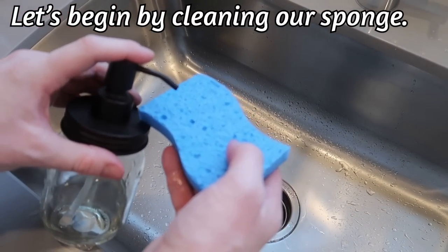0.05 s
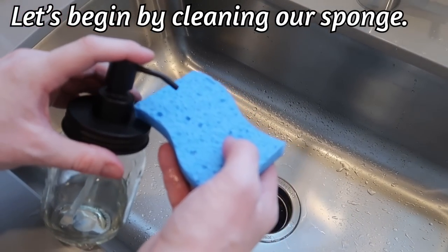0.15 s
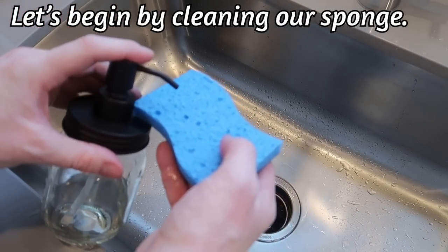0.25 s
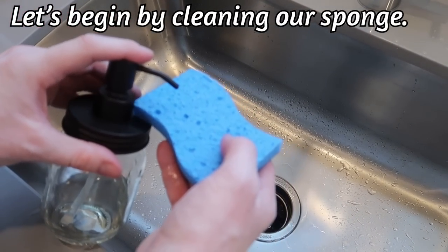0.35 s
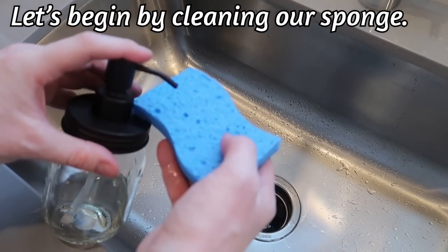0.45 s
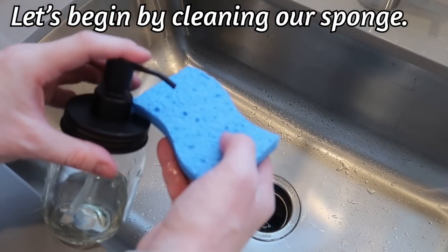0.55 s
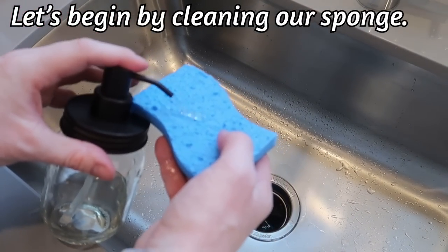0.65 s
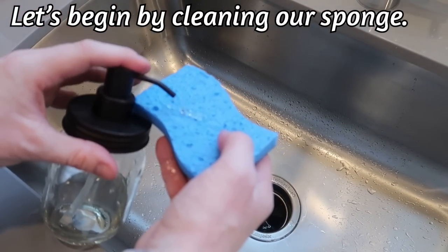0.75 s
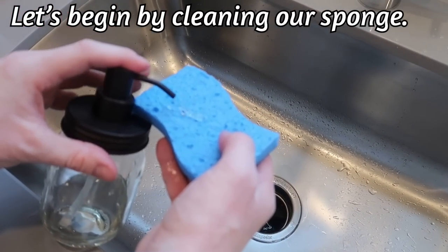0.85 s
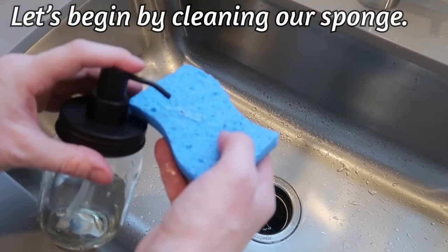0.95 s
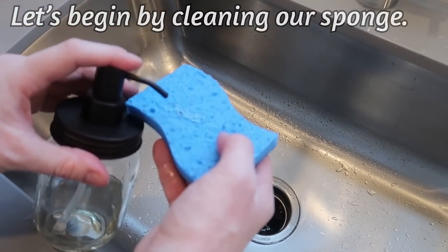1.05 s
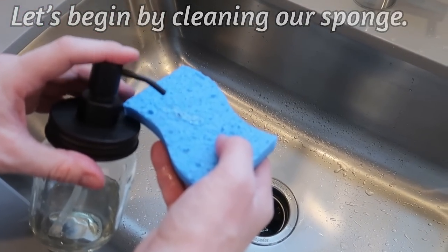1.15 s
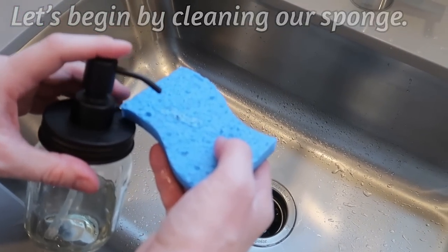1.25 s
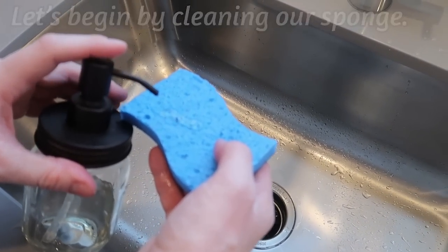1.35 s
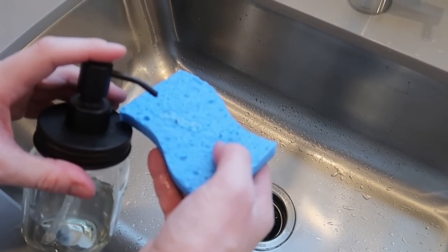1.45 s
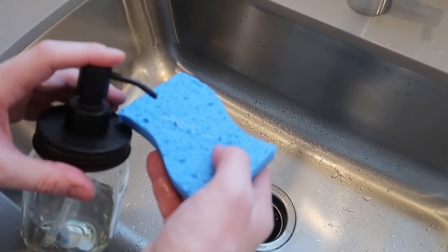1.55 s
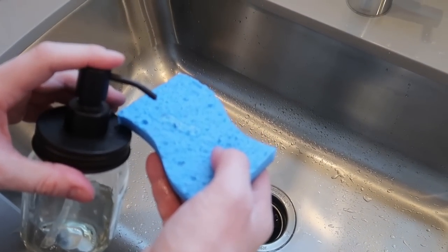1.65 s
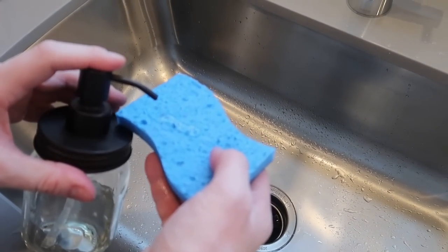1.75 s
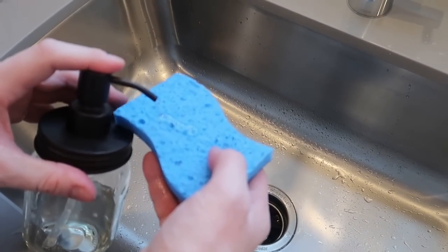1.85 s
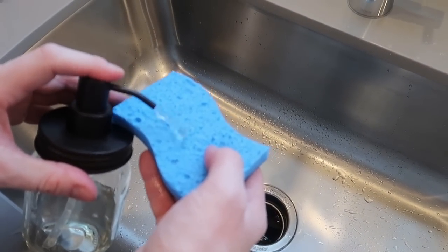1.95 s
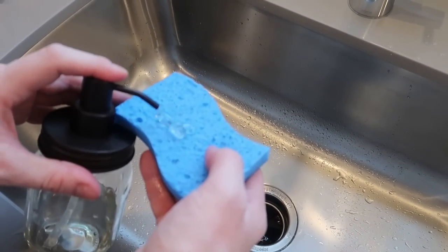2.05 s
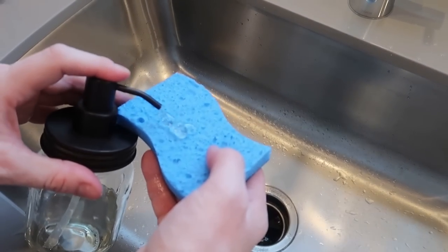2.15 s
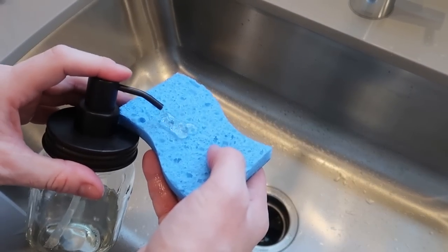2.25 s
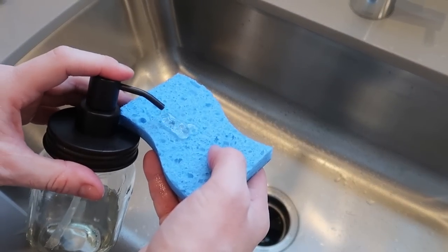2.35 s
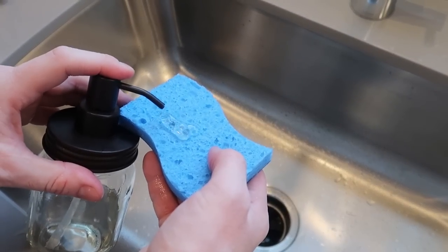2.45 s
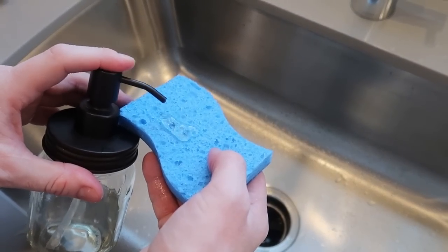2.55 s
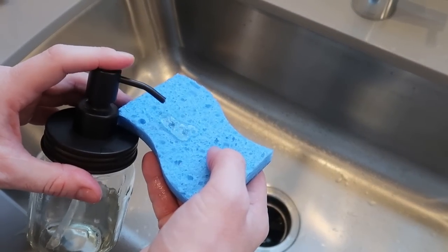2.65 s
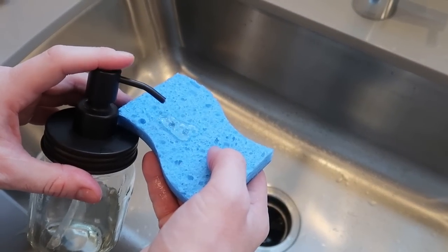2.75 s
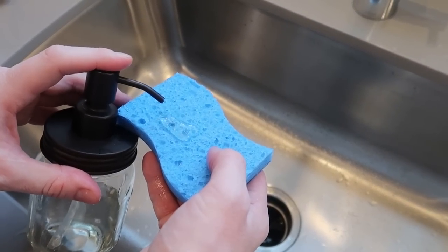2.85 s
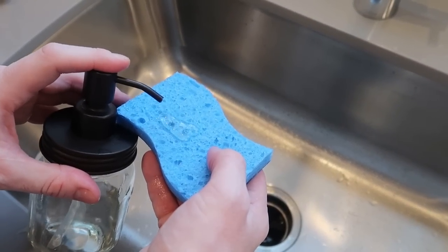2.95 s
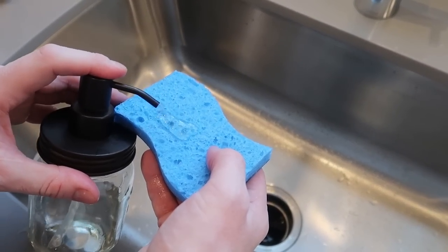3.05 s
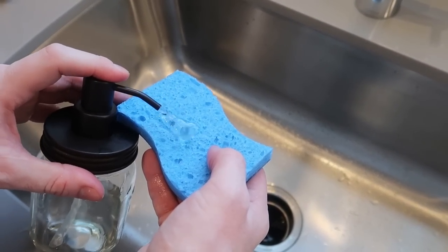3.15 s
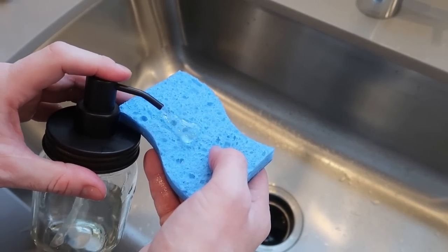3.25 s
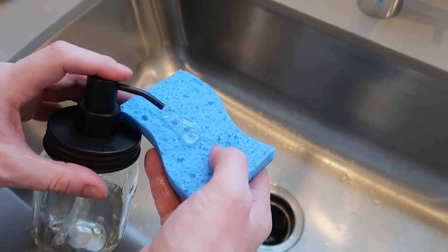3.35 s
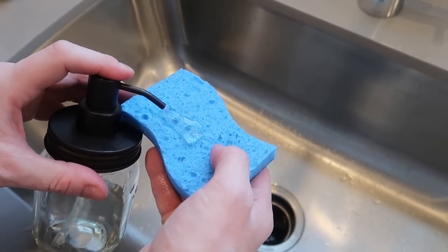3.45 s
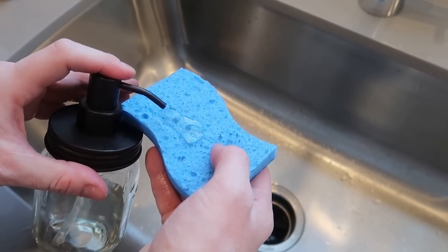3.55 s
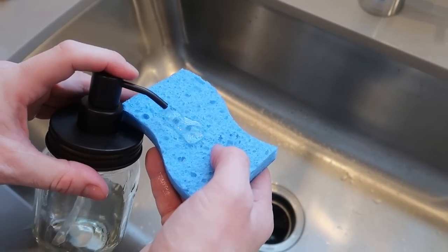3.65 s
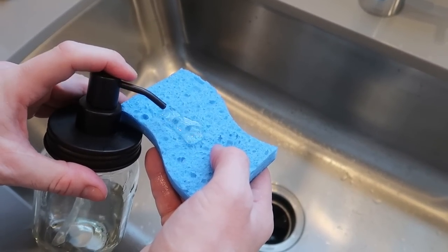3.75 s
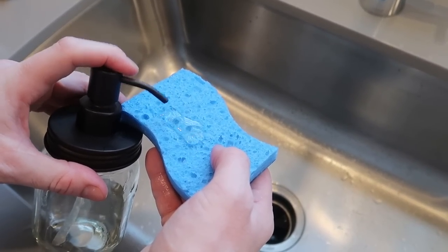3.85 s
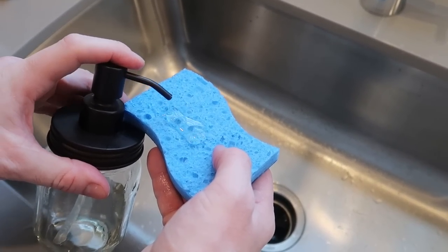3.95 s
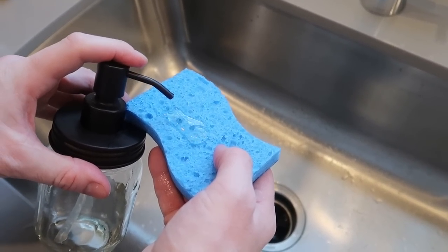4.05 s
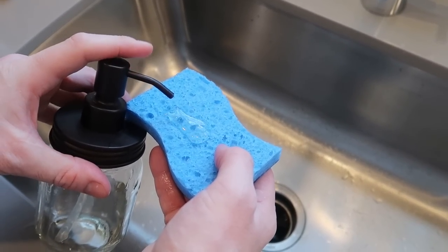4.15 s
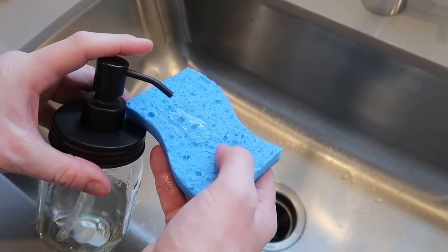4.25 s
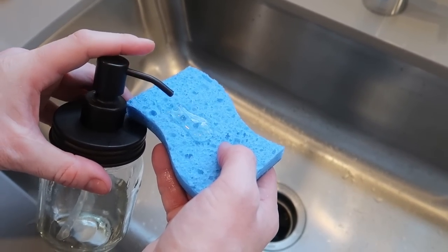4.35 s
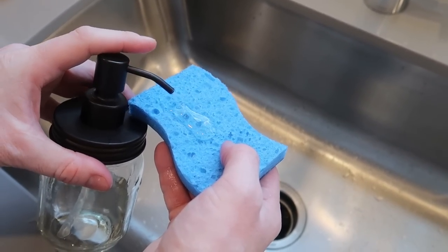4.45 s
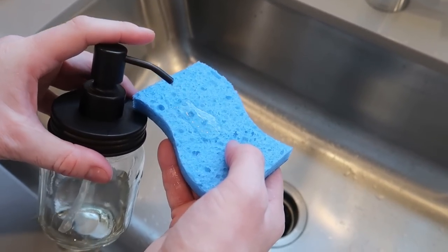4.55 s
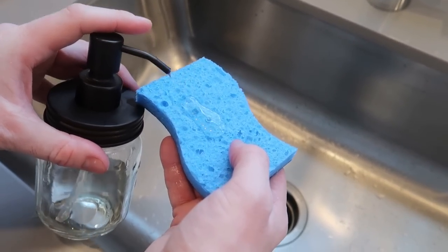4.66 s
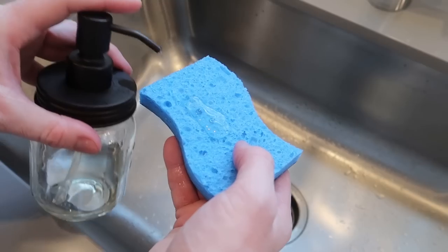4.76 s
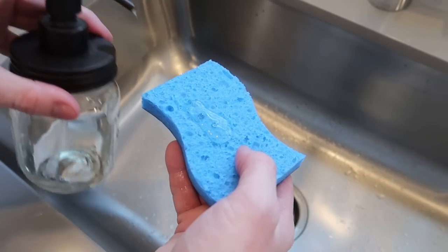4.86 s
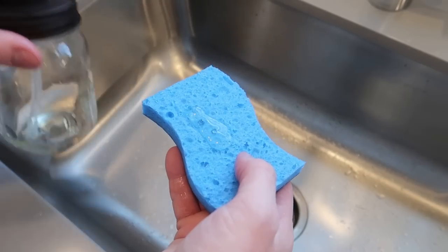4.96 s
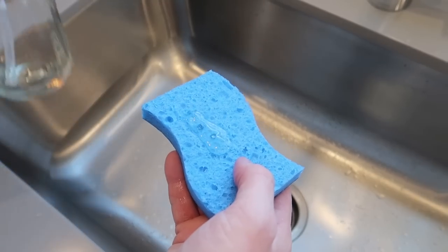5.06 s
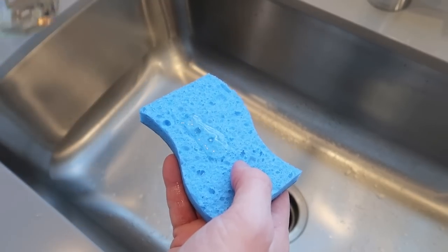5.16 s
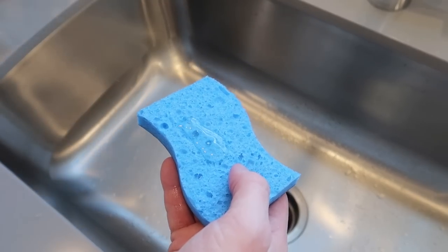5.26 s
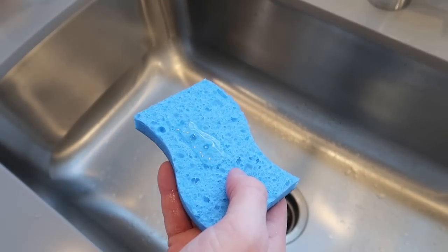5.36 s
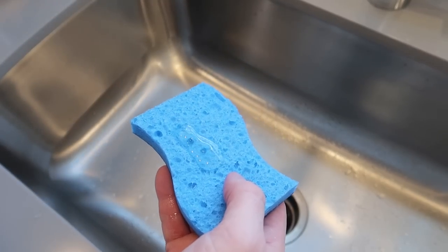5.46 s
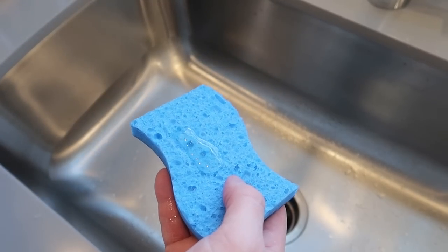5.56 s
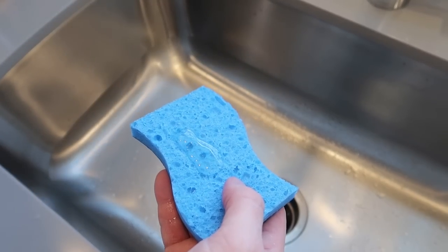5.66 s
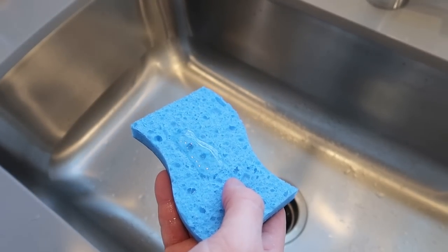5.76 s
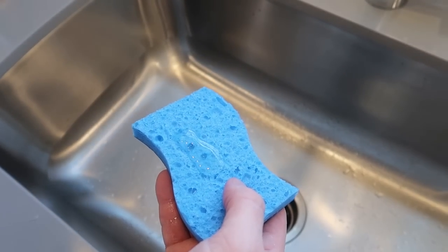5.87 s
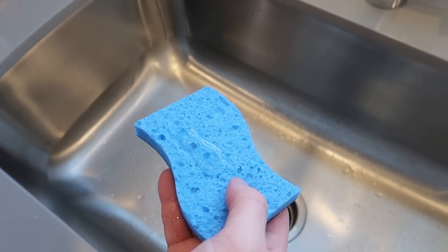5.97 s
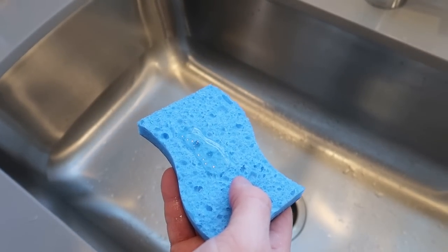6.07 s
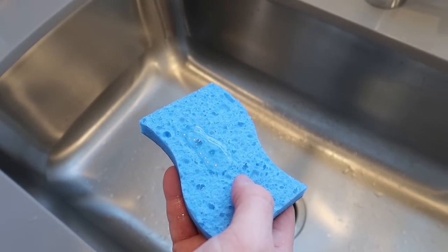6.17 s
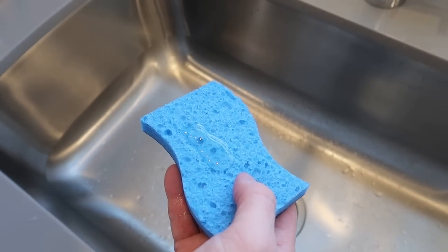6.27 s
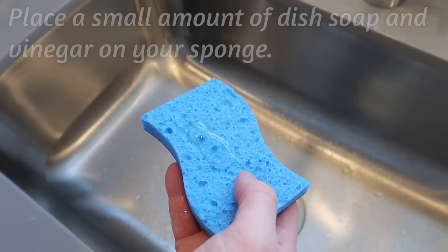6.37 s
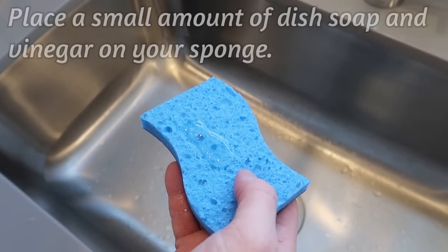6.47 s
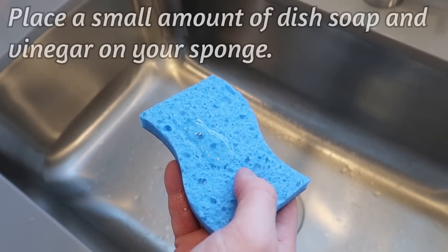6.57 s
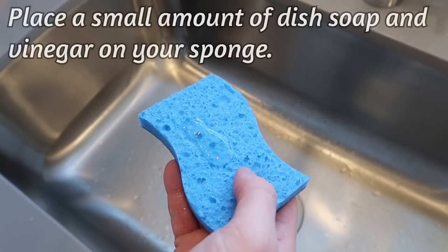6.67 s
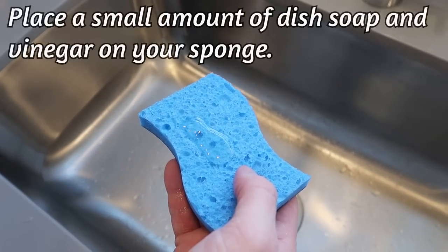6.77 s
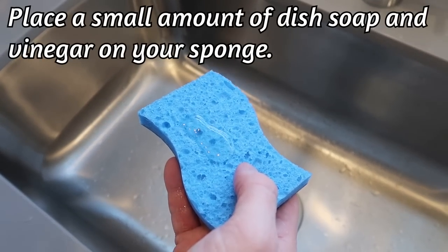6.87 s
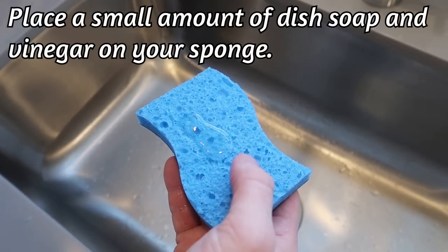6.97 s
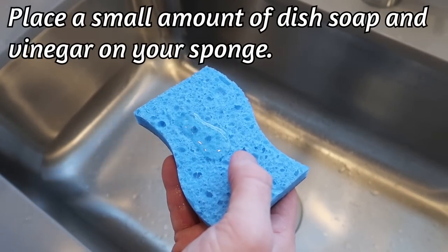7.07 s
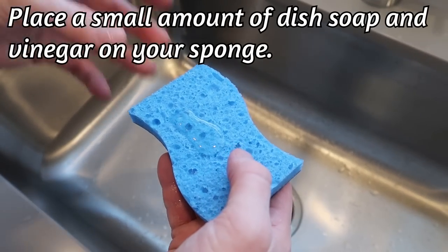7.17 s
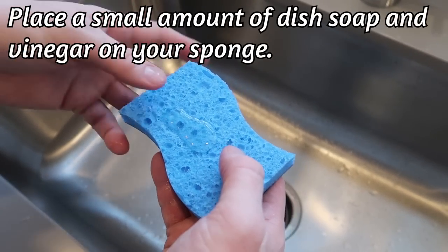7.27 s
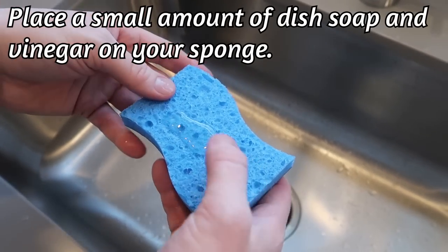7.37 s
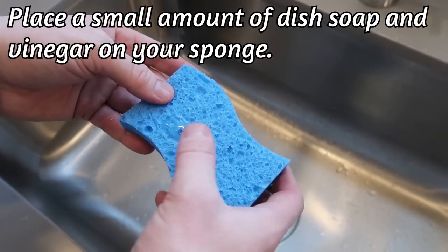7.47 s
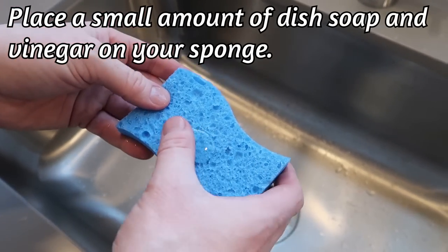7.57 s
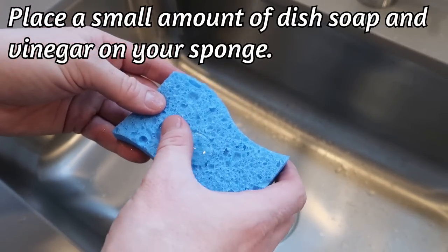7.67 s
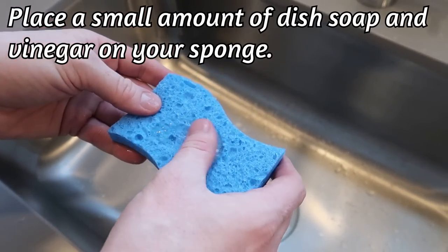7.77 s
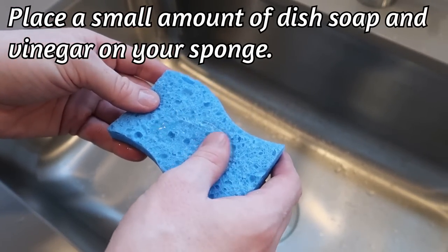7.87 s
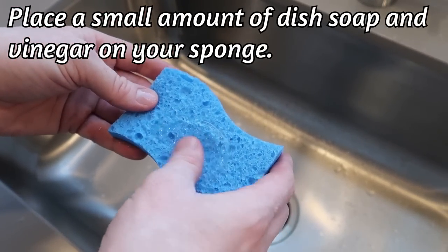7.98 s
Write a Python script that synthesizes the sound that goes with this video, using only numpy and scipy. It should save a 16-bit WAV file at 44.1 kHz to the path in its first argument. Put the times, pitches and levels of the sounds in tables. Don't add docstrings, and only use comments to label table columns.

```python
import sys
import numpy as np
from scipy import signal
from scipy.fft import rfft, irfft
from scipy.io import wavfile
from scipy.ndimage import uniform_filter1d

SR = 44100
rng = np.random.default_rng(int(sys.argv[2]) if len(sys.argv) > 2 else 0)


def materialize(psi):
    bounded = np.clip(np.atleast_2d(psi).T, -1, 1)
    quanta = np.round(bounded * 32767).astype(np.int16)
    wavfile.write(sys.argv[1], SR, quanta)


def voltage_ratio(decibels):
    exponent = np.asarray(decibels, float) / 20
    return 10 ** exponent


N = 353682
T = np.arange(N) / SR
BASIN_BOOM_HZ = 116.2
EFFORT_RISE_DB_S = 1500


def on_log(hz, table):
    at, value = np.transpose(table)
    return np.interp(np.log(np.maximum(hz, 1)), np.log(at), value)


def coloured(size, table):
    hz = np.fft.rfftfreq(size, 1 / SR)
    return irfft(rfft(rng.standard_normal(size)) * voltage_ratio(on_log(hz, table)), size)


def unit(x):
    return x / np.sqrt(np.mean(x ** 2))


def wander(smooth):
    return unit(uniform_filter1d(uniform_filter1d(rng.standard_normal(N), smooth), smooth))


def grains(depth_db, smooth):
    noise = rng.standard_normal(N)
    return noise * voltage_ratio(depth_db * unit(uniform_filter1d(rng.standard_normal(N), smooth)))


def onset(t, rise_s):
    return 1 - np.exp(-t / rise_s)


def ring(modes, slow, scatter_db, rise_s, detune=0.014):
    hz, db, t60 = np.transpose(modes)[:, :, None]
    t = T[:SR // 2]
    chance = rng.standard_normal((3, len(modes), 1))
    waves = np.sign(chance[1]) * np.sin(2 * np.pi * hz * (1 + detune * chance[0]) * t)
    decay = voltage_ratio(-60 * t / np.maximum(t60 * slow, .002))
    x = np.sum(voltage_ratio(db + scatter_db * chance[2]) * waves * decay, axis=0)
    x = x * onset(t, rise_s)
    return x / np.abs(x).max()


def burst(t60, rise_s):
    t = T[:SR // 2]
    return rng.standard_normal(len(t)) * voltage_ratio(-60 * t / t60) * onset(t, rise_s)


def resonate(x, peaks):
    y = 0
    for hz, width, db in peaks:
        b, a = signal.iirpeak(hz, hz / width, fs=SR)
        y = y + voltage_ratio(db) * signal.lfilter(b, a, signal.lfilter(b, a, x))
    return y / np.abs(y).max()


def pressure(rows, rise_db_s, fall_db_s):
    gain = 0
    for s, db, held in rows:
        early = np.maximum(s - T, 0)
        late = np.maximum(T - s - held, 0)
        gain = gain + voltage_ratio(db - rise_db_s * early - fall_db_s * late)
    return gain


def add(out, s, x, pan_db):
    for side, sign in zip(out, (1, -1)):
        i = max(int(s * SR - sign * pan_db * .5), 0)
        side[i:i + len(x)] += x[:N - i] * voltage_ratio(sign * pan_db / 2)


# start_s, middle_level_db, low_rel_db, upper_rel_db,
# ring_t60_factor
BASIN_KNOCKS = [(0.002, -25.5, -9.5, -10.5, 0.36), (0.098, -26.5, -6, -11, 0.38),
                (0.367, -35.5, -0.5, 1, 0.64), (0.635, -24.5, 1, -5.5, 0.65), (0.73, -29, 8, -2, 0.31),
                (1.35, -34, 2, 0, 0.41), (1.952, -34.5, 2.5, -4.5, 0.89), (2.0468, -28, 4.5, 0, 0.29),
                (2.608, -36, -0.5, -10, 0.87), (2.724, -41, 2.5, -3, 0.42), (3.124, -34, -7.5, -3, 0.37),
                (3.131, -25.5, -4, -3.5, 0.093), (3.236, -40.5, 4, 6, 0.28), (4.16, -36, 0.5, -3.5, 0.27),
                (4.292, -49, 5, 0, 0.53)]
# start_s, middle_level_db, low_rel_db
HAND_NUDGES = [(0.129, -42, -11), (1.087, -45, 16), (1.218, -43, 10.5), (1.246, -42.5, 8),
               (1.869, -47, 14.5), (2.452, -43, 10.5), (2.555, -43.5, 6.5), (3.045, -45, 11),
               (3.075, -42.5, 6.5), (3.16, -33.5, -2), (3.187, -43, 2), (0.175, -57, -9), (0.442, -60, 5),
               (6.669, -41.5, 7)]
# start_s, middle_level_db, low_rel_db, upper_rel_db, wall_pitch_hz
WALL_KNOCKS = [
    (3.2153, -21, 6.5, 1, 910),
    (3.739, -49.5, 11.5, 11, 995),
    (3.9591, -31.5, 2, 4.5, 1039),
]
# start_s, middle_level_db, low_rel_db, upper_rel_db
BASE_ROCKS = [
    (4.507, -30.5, -0.5, -12.5),
    (4.538, -45, 6, -12),
    (6.708, -29.5, -6, -15),
    (6.716, -29, -26, -7),
    (6.744, -39, -1, -2),
    (6.92, -49, 11, 0),
    (6.96, -54, -1, -2),
    (4.198, -53, -14, -18),
]
# pitch_hz, level_db, t60_s
BASIN_LOW_MODES = [(181, 2, 0.1), (229.5, -2.5, 0.21), (260.4, 3, 0.16), (294.4, 3, 0.17),
                   (337.2, 4.5, 0.21), (400, -1, 0.12)]
BASIN_MID_MODES = [(451.5, -0.5, 0.12), (503.3, -5.5, 0.32), (556, 2, 0.14), (625, -10, 0.32),
                   (751, -1, 0.13)]
BASIN_UP_MODES = [(690, -24, 0.12), (893, -3.5, 0.2), (1005, 13.5, 0.055), (1206, -10, 0.3),
                  (1146, -39, 0.18), (1388, -21, 0.038), (1460, -34, 0.027), (1800, -61, 0.02)]


def knocks():
    out = np.zeros((2, N))
    soft_s, basin_lead_hz = .003, 562
    many = signal.butter(5, [420, 1600], "bandpass", fs=SR, output="sos")
    blows = [(*row, basin_lead_hz) for row in BASIN_KNOCKS]
    blows += [(*row, -9, 0.45, basin_lead_hz) for row in HAND_NUDGES]
    blows += [(*row, 0.4, hz) for *row, hz in WALL_KNOCKS]
    blows += [(*row, 0.37, 699) for row in BASE_ROCKS]
    for s, db, low_db, up_db, slow, hz in blows:
        low = voltage_ratio(low_db - 1.0) * ring(BASIN_LOW_MODES, 0.66, 2.5, 2 * soft_s)
        mid = 0.7 * ring(BASIN_MID_MODES, slow, 1.8, soft_s)
        rattle = signal.sosfilt(many, burst(0.28 * slow, soft_s))
        rattle = rattle / np.abs(rattle).max()
        on_jar = hz > 850
        up = ring(BASIN_UP_MODES, slow, 6.2, soft_s / 2) + 0.69 * rattle
        up = voltage_ratio(up_db - 11.0 * on_jar) * up
        lead_db = up_db - 3.5 if on_jar else -6.5 - 0.4 * up_db
        lead_rise_s = soft_s / 4 if on_jar else soft_s
        lead = voltage_ratio(lead_db) * ring([(hz, 0, .11)], slow, 0, lead_rise_s, detune=0)
        add(out, s, voltage_ratio(db) * (low + mid + up + lead), 0)
    return out


# start_s, level_db, lower_rel_db, upper_rel_db, left_minus_right_db
HEAD_SNAPS = [(0.6829, -11, -7.5, -23, 1), (0.6859, -20, -6, -23, -1.5), (1.95, -21.5, 0.5, -17, 1),
              (1.9544, -44, -10, -26, 0), (2.0478, -32, 1.5, -32, 1), (2.599, -32, -1, -25, -1),
              (2.6018, -29.5, 5, -17, 1), (3.1262, -31, -7, -3, -2.5), (3.128, -32, -21, 0, 11),
              (3.215, -28, 8.5, -12, 2), (3.967, -46, 9, -3, 0)]
# start_s, level_db, lower_rel_db
HEAD_CREAKS = [(1.086, -52, -5), (1.1522, -42.5, -4), (1.168, -59, -11), (1.2368, -46, 5),
               (1.2572, -57, 17), (2.439, -53, 5), (2.5545, -46.5, -6), (3.739, -53, -3),
               (4.3924, -51, -14), (4.4822, -53, -1), (4.616, -53, -9.5)]
# pitch_hz, width_hz, level_db
HEAD_PEAKS = [(2800, 1080, 11), (3080, 410, 11), (3160, 560, -6), (3410, 97, 11.5), (3520, 250, 8)]
COLLAR_PEAKS = [(1600, 1700, 18.5), (1470, 170, 15), (1940, 130, 21.5), (2260, 220, -9)]
HEAD_TOP_PEAKS = [(4820, 540, -19), (5320, 1300, -9), (6360, 2500, -16)]


def snaps():
    out = np.zeros((2, N))
    dull = signal.butter(5, 3950, fs=SR, output="sos")
    snap_t60_s, creak_t60_s, creak_up_db, creak_pan_db = 0.026, 0.078, -11, 1
    clicks = [(*row, snap_t60_s) for row in HEAD_SNAPS]
    clicks += [(*row, creak_up_db, creak_pan_db, creak_t60_s) for row in HEAD_CREAKS]
    for s, db, low_db, up_db, pan_db, t60 in clicks:
        hit = voltage_ratio(-18.0) * burst(t60, 0.00018)
        heavy = voltage_ratio(-11) * hit
        hit[0] = heavy[0] = 1
        body = resonate(hit, HEAD_PEAKS) + voltage_ratio(low_db) * resonate(heavy, COLLAR_PEAKS)
        body = signal.sosfilt(dull, body)
        add(out, s, voltage_ratio(db) * (body + voltage_ratio(up_db) * resonate(hit, HEAD_TOP_PEAKS)), pan_db)
    return out


# start_s, level_db, broad_rel_db, left_minus_right_db, pitch_hz
SPRING_TICKS = [(0.679, -44, -14, -1, 8800), (0.682, -29.5, -28, 0, 12500), (0.6875, -37.5, 10.5, 2, 12000),
                (0.8655, -54, -20, 4.5, 12500), (1.949, -51, 6, 8, 11800), (2.6004, -54, -12, 3, 11800),
                (2.6114, -47, -12, 2.5, 11800), (3.1247, -35, -9, 5, 12200), (3.128, -30.5, -18, 8, 12100),
                (3.1321, -34, -18, 2.5, 11200), (3.2093, -57, 5, -1, 11000), (3.2154, -53, 6, 5.5, 8850),
                (3.953, -48, -12, 1.5, 8500), (3.96, -47, -15, 0, 14500), (3.9605, -47, -14, -1, 11900),
                (3.968, -49, -6, 4.5, 11500), (4.8524, -64, 13, -0.5, 10000), (6.4, -46.5, 2, 6, 8700)]
# pitch_hz, width_hz, level_db
SPRING_SEAT = [(8440, 8400, 0)]


def ticks():
    out = np.zeros((2, N))
    for s, db, low_db, pan_db, hz in SPRING_TICKS:
        hit = burst(0.007, 0.00014)
        wire = resonate(hit, [(hz, 1600, 0)])
        add(out, s, voltage_ratio(db) * (wire + voltage_ratio(low_db) * resonate(hit, SPRING_SEAT)), pan_db)
    return out


# start_s, level_db, hollow_rel_db, long_ring_rel_db, ring_t60_factor
BALL_CHINKS = [
    (2.602, -57, -6, -4, 0.9),
    (2.6105, -48.5, 10.5, -6, 0.53),
    (3.13, -37, -28, -22, 0.9),
    (3.967, -39.5, -18, -11.5, 0.93),
    (4.3923, -59, -2, 2, 0.1),
    (6.314, -55, 1, -1, 0.08),
]
# pitch_hz, level_db, t60_s
BALL_MODES = [(4070, -6.5, 0.11), (4400, -28, 0.065), (5100, -12, 0.064), (6180, -7.5, 0.088),
              (6368, -13, 0.08), (6540, -3.5, 0.076), (7780, -12, 0.09), (8900, -24, 0.071)]
HOLLOW_MODE = [(3025, 0, 0.13)]
LONG_RING = [(5376, 0, 0.17)]


def chinks():
    out = np.zeros((2, N))
    for s, db, hollow_db, sing_db, slow in BALL_CHINKS:
        glass = 0.84 * ring(BALL_MODES, slow, 0.92, 0.00089, detune=0.0011)
        sing = voltage_ratio(sing_db) * ring(LONG_RING, slow, 0, 0.0087, detune=0)
        hollow = voltage_ratio(hollow_db) * ring(HOLLOW_MODE, slow, 0, 0.0044, detune=0)
        add(out, s, voltage_ratio(db) * (glass + sing + hollow), .3)
    return out


# start_s, level_db
LANDING = [
    (6.399, 0.5),
]
# pitch_hz, level_db per Hz
THUD_SPECTRUM = [(59, -27), (100, 10), (170, 1.5), (260, 0.5), (505, -6), (636, -3.5), (1010, 4),
                 (1980, -8), (2140, -10), (3400, -32.5), (6300, -45), (7350, -81), (10000, -63),
                 (13000, -85), (22000, -120)]
# pitch_hz, level_db, t60_s
COUNTER_MODES = [(116.5, -22, 0.94), (158, -23, 0.13), (216, -3, 0.1), (258, -1, 0.18), (334, -3.5, 0.095),
                 (491.5, 0.5, 0.22), (563, -10, 0.19), (707.4, -5, 0.27), (606, -8, 0.17), (910, -11, 0.18),
                 (970, -4, 0.15), (1085, -11, 0.17), (1232, -0.5, 0.16), (1403, -6, 0.11),
                 (1660, -22, 0.12), (1940, -9, 0.28), (2226, 6.5, 0.03), (2346, -5, 0.033)]
GLASS_MODES = [(4100, -4, 0.0245), (4480, 0, 0.058), (5140, -15, 0.026), (6190, 4.5, 0.071),
               (6280, -11, 0.22), (8700, -10, 0.024)]


def set_down():
    out = np.zeros((2, N))
    s, db = LANDING[0]
    t = T[:SR // 2]
    cupboards = voltage_ratio(-15.0 - 60 * t / 0.63)
    thud = unit(coloured(len(t), THUD_SPECTRUM)) * (voltage_ratio(-60 * t / 0.084) + cupboards) * onset(t, 0.0032)
    top = ring(COUNTER_MODES, 0.51, 0, 0.0013, detune=0)
    small = signal.butter(3, 95, "highpass", fs=SR, output="sos")
    wood = signal.sosfilt(small, voltage_ratio(db - 11.5) * thud + voltage_ratio(db - 6.0) * top)
    swell = voltage_ratio(db - 9.5 - 60 * t / 0.22) * onset(t, 0.021) ** 2
    wood = wood + swell * np.sin(2 * np.pi * BASIN_BOOM_HZ * t)
    loose = signal.butter(6, (910, 2530), "bandpass", fs=SR, output="sos")
    mid, side = (signal.sosfilt(loose, burst(0.28, 0.0017)) * voltage_ratio(db - 18.5) for _ in range(2))
    for channel, sign in zip(out, (1, -1)):
        channel[int(s * SR):][:len(t)] += mid + sign * voltage_ratio(-5) * side
    glass = voltage_ratio(db - 37.0) * ring(GLASS_MODES, 0.99, 0, 0.00037, detune=0)
    add(out, s, wood + glass, .1)
    return out


# start_s, pitch_hz, level_db, t60_s
LONE_PINGS = [(0.0005, 854, -28.5, .05), (0.012, 537, -34, .05), (0.021, 1340, -47, .06),
              (0.048, 800, -40, .05), (0.098, 566, -29, .1), (0.104, 1450, -44, .06),
              (0.109, 1850, -51, .05), (0.124, 567, -40, .08), (0.16, 567, -44, .1),
              (1.068, 2000, -58, .03), (1.068, 2950, -56, .03), (1.087, 3300, -52, .03),
              (1.152, 2010, -50, .06), (1.168, 3250, -53, .02), (1.237, 2700, -43, .03),
              (1.262, 2050, -49, .04), (1.283, 3100, -59, .03), (2.6, 1960, -34, .07),
              (2.6, 4430, -40, .02), (2.601, 5330, -41, .03), (2.612, 1850, -40, .06),
              (2.632, 1110, -45, .07), (3.1275, 3670, -37, .05), (3.128, 3070, -29, .015),
              (3.132, 243, -21, 0.079), (3.155, 3300, -49, .03), (3.168, 3980, -44, .02),
              (3.196, 3200, -50, .02), (3.211, 3660, -39, .015), (3.216, 4400, -37, .015),
              (3.217, 1490, -38.5, .06), (3.23, 1810, -43, .08), (3.959, 2000, -46, .02),
              (3.959, 1046, -30, .045), (3.972, 2000, -55, .05), (3.972, 616, -37, .1),
              (3.98, 1110, -50, .2), (0.684, 3330, -33, 0.13), (0.667, 3600, -52, .03),
              (4.394, 4100, -58, .02), (4.418, 5300, -57, .02), (4.616, 3030, -58, .02),
              (1.951, 3730, -36, .04), (3.208, 5300, -48, .015), (6.41, 2580, -39, 0.26),
              (6.42, 2050, -38, 0.29), (6.403, 4600, -46, .05), (6.4037, 502, -17.5, .05),
              (6.411, 988, -11, .05),
              (0.38, 250, -33, 0.16), (0.374, 640, -39, 0.065), (0.38, 1360, -43, .08),
                (0.436, 190, -37, .04), (0.74, 490, -33.5, 0.057), (1.952, 180, -34, 0.042),
                (2.052, 338.6, -24.5, 0.18), (2.078, 360, -31, .1), (2.066, 1100, -44, .06),
                (2.43, 550, -46, 0.11), (3.08, 553, -50, .06), (3.129, 550, -30, .04),
                (3.158, 540, -29, 0.049), (3.157, 230, -27, .06), (3.221, 338, -19.5, .12),
                (3.244, 335, -23, 0.095), (3.277, 330, -32.5, .08), (3.134, 195, -30, 0.072),
                (3.14, 450, -35, 0.11), (3.182, 200, -33, .08), (3.192, 580, -33, .05),
                (3.222, 467, -29.5, 0.074), (3.124, 1400, -33, .04), (3.086, 273, -40, .08),
                (1.5, 215, -35, 0.11), (1.2, 1300, -46, .08), (2.05, 1400, -38, .04), (3.6, 284, -37, .04),
                (4.33, 710, -52, .08), (4.158, 690, -39, .05), (4.51, 590, -38, .12),
                (6.402, 142, -14.5, 0.089), (6.428, 125, -27, .12), (6.405, 1230, -21, 0.076),
                (6.715, 950, -34, 0.045), (6.73, 520, -36, .08), (6.76, 620, -42, 0.041)]


def pings():
    out = np.zeros((2, N))
    t = T[:SR // 4]
    for s, hz, db, t60 in LONE_PINGS:
        swell = voltage_ratio(db - 60 * t / t60) * onset(t, 0.00065)
        add(out, s, swell * np.sin(2 * np.pi * hz * t), 0)
    return out


# start_s, level_db, held_s
PISTON_SLIDES = [(0.68, -51, 0.002), (0.69, -57, 0.024), (0.72, -78, 0.12), (1.01, -79, 0.23),
                 (1.236, -72, 0.06), (1.96, -60.5, 0.0056), (1.995, -72, 0.046), (2.605, -56.5, 0.012),
                 (3.145, -67, 0.032), (3.19, -80, 0.022), (3.22, -61, 0.0053), (4.41, -80.5, 0.288),
                 (4.76, -75.5, 0.08), (4.86, -81, 0.37), (7.12, -78, 0.11), (7.3, -79.5, 0.21),
                 (7.52, -78, 0.31), (7.91, -78, 0.046)]


def slides():
    sleeve = [(2160, 180, 14), (2880, 1850, 17), (3425, 250, 14), (5900, 3000, -42)]
    scrape = unit(resonate(grains(3, 100), sleeve))
    return scrape * voltage_ratio(10.5) * pressure(PISTON_SLIDES, EFFORT_RISE_DB_S, 1187)


# start_s, level_db, held_s
BASE_GRATES = [(0.02, -56, 0.092), (0.11, -58, 0.023), (0.38, -56, 0.022), (1.36, -52.5, .03),
               (2.06, -53, 0.018), (3.225, -46, 0.017), (3.98, -61, 0.026), (4.165, -59, 0.018),
               (6.715, -56, .015), (0.645, -44.5, 0.022), (6.42, -40, .03), (6.48, -51, 0.035)]


def grate():
    body = resonate(grains(2.5, 130), [(800, 500, 11), (1085, 500, 6), (1550, 670, -12.5)])
    dull = signal.butter(6, 2700, fs=SR, output="sos")
    body = unit(signal.sosfilt(dull, body))
    return body * pressure(BASE_GRATES, EFFORT_RISE_DB_S, 255)


# full_push_s,
# level_db, held_s
HAND_PUSHES = [(0.07, -45.5, 0.02), (0.15, -41.5, 0.023), (0.44, -45, 0.0073), (0.72, -40, 0.015),
               (0.8, -43.5, 0.015), (1.14, -37, 0.0033), (1.28, -35, 0.019), (1.51, -45, 0.0081),
               (1.91, -44.5, 0.033), (2.0, -37.5, 0.024), (2.1, -43, 0.034), (2.49, -46, 0.0089),
               (2.61, -34, 0.0022), (2.71, -39, 0.0039), (3.09, -43, 0.0057), (3.165, -21.5, 0.094),
               (3.36, -38, 0.0044), (3.57, -58, 0.02), (3.78, -42.5, 0.019), (4.0, -32, 0.034),
               (4.1, -50, 0.099), (4.33, -48, 0.0039), (4.51, -45, 0.077), (4.68, -57, 0.12),
               (6.535, -41, 0.008)]


def boom():
    pitch_hz = BASIN_BOOM_HZ * (1 + 0.024 * wander(1500))
    tone = np.sin(2 * np.pi * np.cumsum(pitch_hz) / SR)
    return np.sqrt(2) * tone * pressure(HAND_PUSHES, 319, 425)


# pitch_hz, t60_s, level_db
ROOM_BANDS = [(201.5, 0.29, 5.5), (500, 0.29, 7.5), (920, 0.36, 1), (2250, 0.25, -9), (5300, 0.48, -6),
              (11000, 0.055, 9.5)]


def room(x, wide):
    t = T[:SR]
    tail = np.zeros((2, SR))
    for hz, t60, db in ROOM_BANDS:
        band = signal.butter(2, [hz / 1.5, hz * 1.5], "bandpass", fs=SR, output="sos")
        tail += voltage_ratio(db) * signal.sosfilt(band, rng.standard_normal((2, SR))) * voltage_ratio(-60 * t / t60)
    tail = tail * onset(t, 0.0019) / np.sqrt(np.sum(tail[0] ** 2))
    mid, side = signal.fftconvolve(x[None], tail, axes=1)[:, :N]
    return np.array([mid + wide * side, mid - wide * side])


# multiple, level_db
MOTOR_HARMONICS = [(1, -61), (2, -59), (3, -74.5), (4, -61.5), (5, -51)]


def fridge():
    motor_hz = 59.34
    out = 0
    for k, db in MOTOR_HARMONICS:
        gain = np.sqrt(2) * voltage_ratio(db + 3.0 * wander(3000))
        out = out + gain * np.sin(2 * np.pi * (k * motor_hz * T + rng.random()))
    return out


# pitch_hz, level_db per Hz
HISS_SPECTRUM = [(12, -41), (20, -15.5), (81, 1), (191, -11.5), (299, -7.5), (353, -13), (467, -16.5),
                 (552, -19.5), (771, -21), (839, -21.5), (964, -22.5), (1210, -23.5), (8970, -40.5),
                 (11500, -47.5), (15700, -55)]
# pitch_hz, side_minus_mid_db
HISS_WIDTH = [(60, -68), (110, -19), (200, -11), (380, -6), (700, -3.5), (1290, 0.5), (2380, 2),
              (4400, 3.5), (8120, 0), (15000, 2.5)]
# pitch_hz, width_hz, level_db
ROOM_TONES = [(76.4, 16, -65.5), (251.4, 11, -60.5), (320, 180, -65), (457, 16, -62.5), (478, 18, -68.5),
              (648, 12, -73), (844, 20, -67.5)]


def kitchen():
    hz = np.fft.rfftfreq(N, 1 / SR)
    shape = voltage_ratio(on_log(hz, HISS_SPECTRUM))
    shape = shape / np.sqrt(np.sum(shape[hz > 500] ** 2) / len(hz)) * voltage_ratio(-58.5)
    tones = 0
    for f, width, db in ROOM_TONES:
        peak = 2 / (1 + (2 * (hz - f) / width) ** 2) ** 2
        tones = tones + voltage_ratio(2 * db) * SR / (np.pi * width) * peak
    shape = np.sqrt(shape ** 2 + tones)
    mid = irfft(rfft(rng.standard_normal(N)) * shape, N)
    side = irfft(rfft(rng.standard_normal(N)) * shape * voltage_ratio(on_log(hz, HISS_WIDTH)), N)
    return np.array([mid + side, mid - side])


def scene():
    near = knocks() + snaps() + ticks() + slides() + pings()
    ball = chinks()
    jar = set_down()
    to_room = voltage_ratio(-10.0) * (near + voltage_ratio(2) * ball).mean(axis=0) + voltage_ratio(-14.5) * jar.mean(axis=0)
    echoes = room(to_room, 0.074)
    return near + ball + jar + echoes + boom() + kitchen() + fridge() + grate()


def low_pass(x):
    return signal.sosfilt(signal.butter(12, 15820, fs=SR, output="sos"), x)


def record(dry):
    top = signal.butter(10, 15000, fs=SR, output="sos")
    mix = signal.sosfilt(top, dry)
    return low_pass(mix)


dry = scene()
out = record(dry)
materialize(out)
```